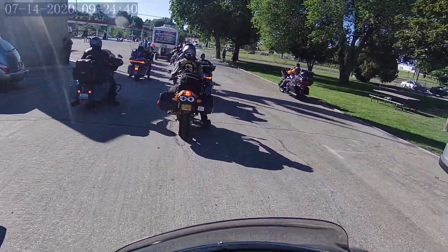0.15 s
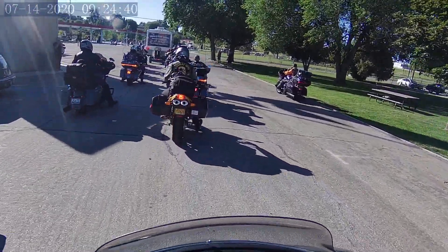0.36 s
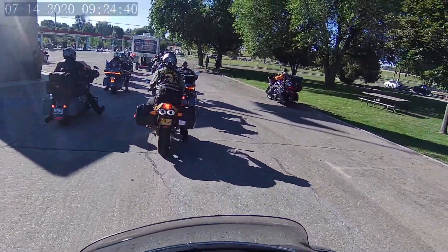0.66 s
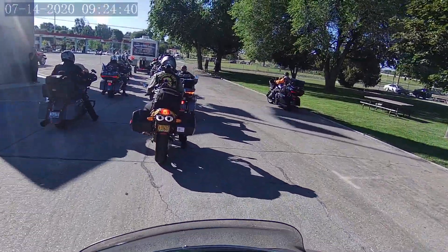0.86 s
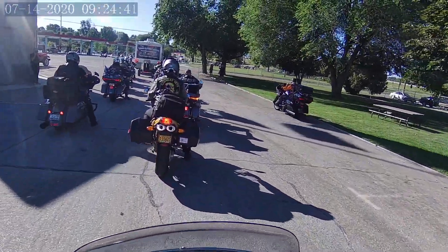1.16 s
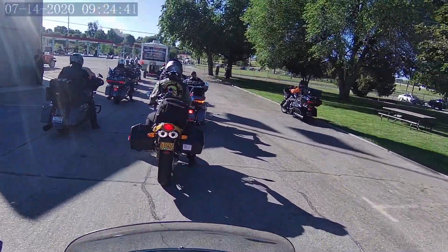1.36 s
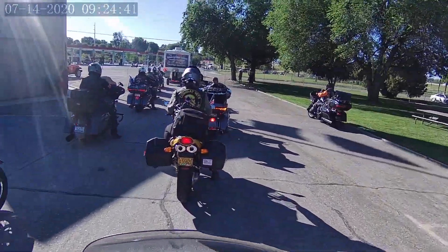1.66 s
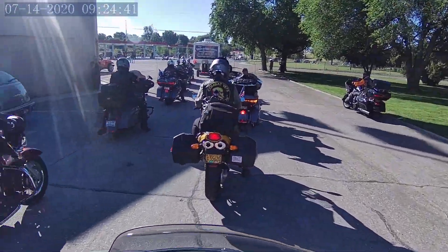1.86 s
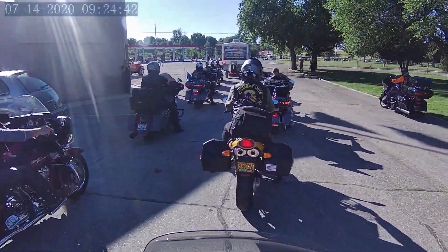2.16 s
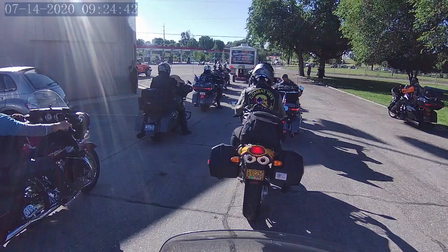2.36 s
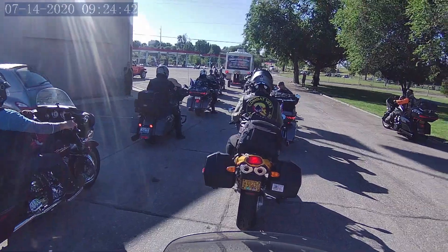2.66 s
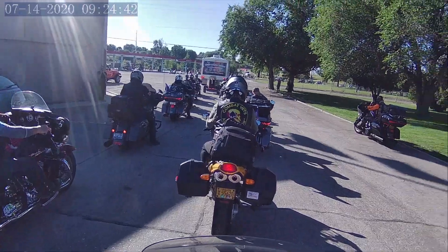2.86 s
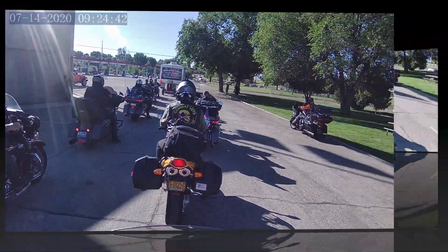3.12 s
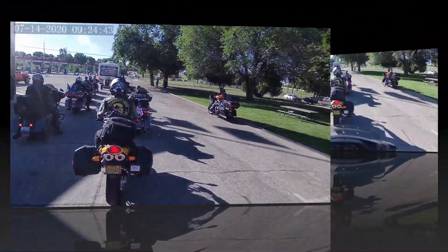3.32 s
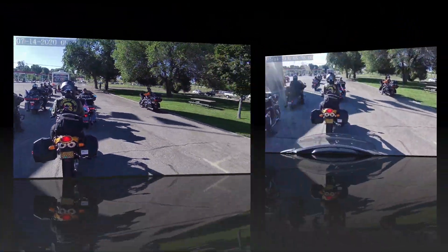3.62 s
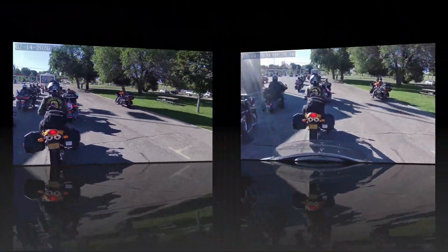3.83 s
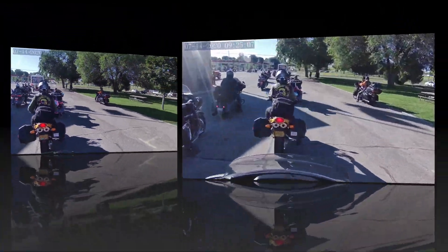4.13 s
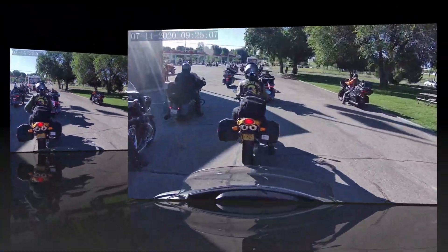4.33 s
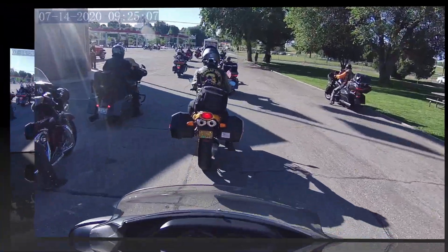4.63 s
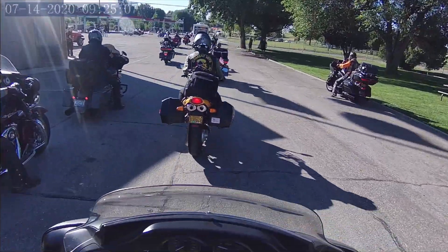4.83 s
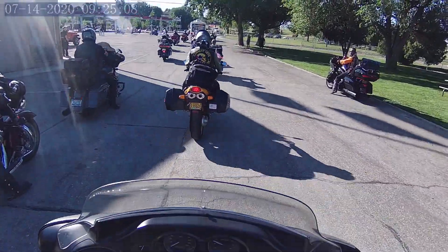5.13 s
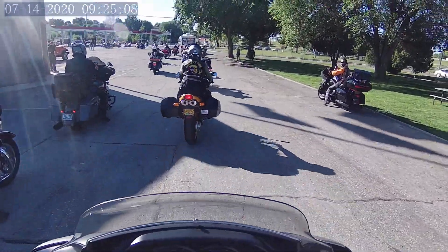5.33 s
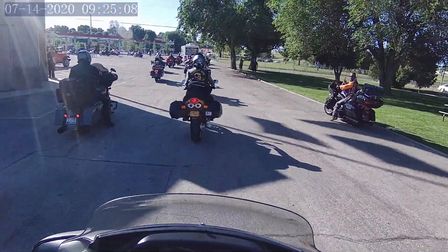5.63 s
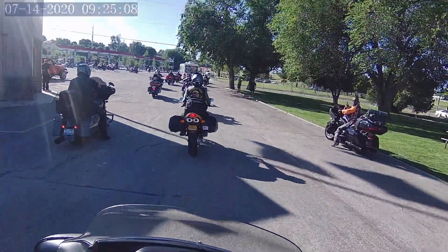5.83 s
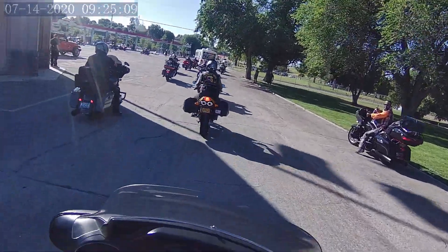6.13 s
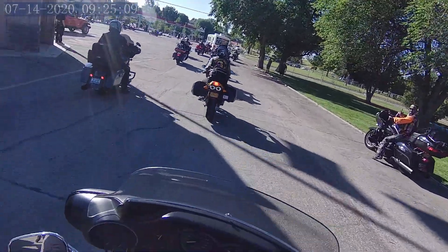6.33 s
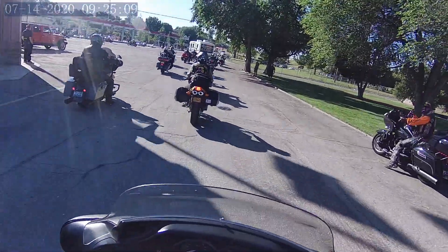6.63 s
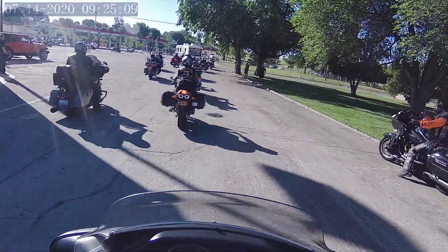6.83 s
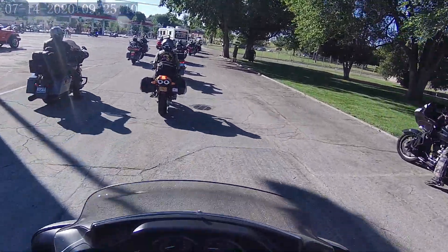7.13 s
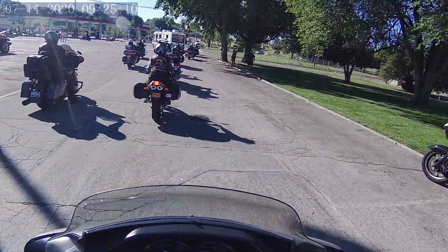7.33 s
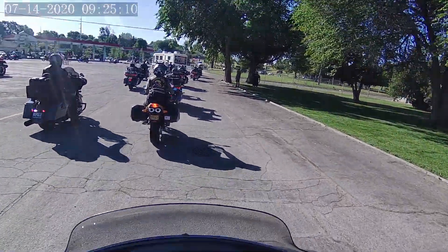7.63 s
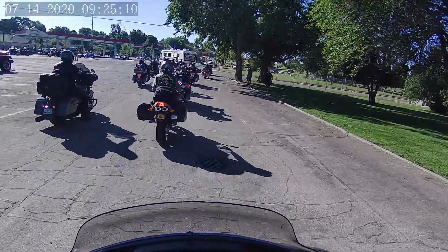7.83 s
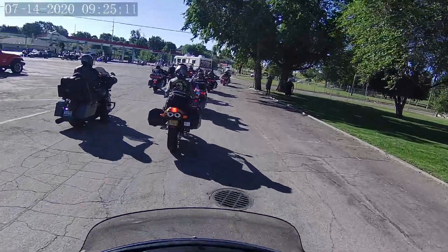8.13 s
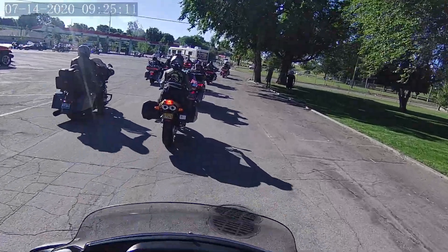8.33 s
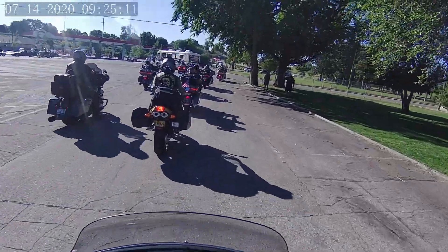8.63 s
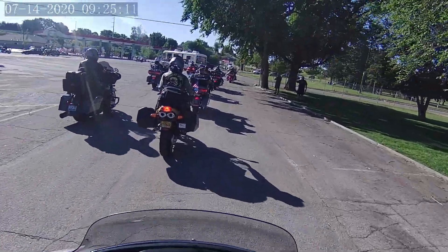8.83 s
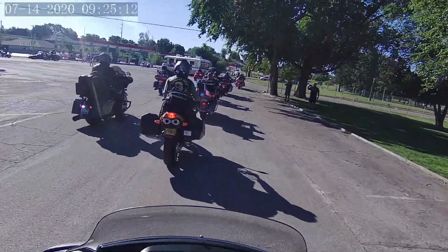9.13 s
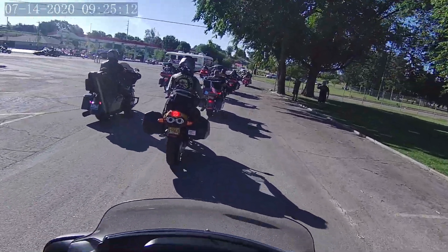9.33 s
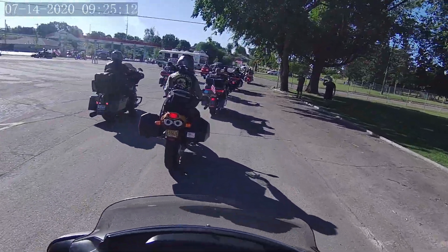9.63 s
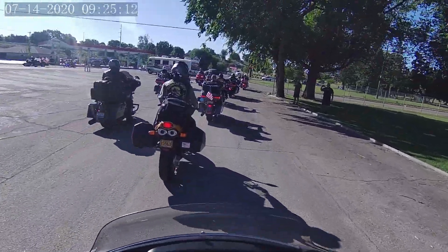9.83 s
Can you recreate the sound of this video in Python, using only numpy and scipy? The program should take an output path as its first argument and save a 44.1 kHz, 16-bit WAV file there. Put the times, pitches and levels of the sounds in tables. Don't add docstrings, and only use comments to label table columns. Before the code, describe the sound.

A motorcycle idles in an open parking lot, heard through a small, muffled microphone riding on it. From 0 to 3 seconds it is quiet: a low, fluttering engine hum, scattered tiny metallic valve ticks, a faint wavering gear whine around 1 to 2.5 seconds, and distant bikes. Around 3 to 4 seconds the sound swells into a louder moment, with heavy exhaust thumps and hissing, rattling roar. A hard throttle blip cracks sharply near 4.2. From about 4.6 to 6.3 a twin-cylinder bike rolls past close by, booming unevenly with dry pops, while more revs bark and the group rumbles. Strong cracks and thumps continue until about 6.8. Then the throttle shuts: chugs and harder ticks, with a brief muffled burble near 7.4 to 7.7. After 8 seconds it fades to soft regular thumps, valve ticks and low idle.

```python
import sys
import numpy as np
from scipy import signal
from scipy.io import wavfile
from scipy.ndimage import uniform_filter1d

SR = 44100
rng = np.random.default_rng(int(sys.argv[2]) if len(sys.argv) > 2 else 0)


def boost(x):
    u = np.asarray(x, float) / 20
    return 10 ** u


def dump(signal):
    limited = np.clip(np.atleast_2d(signal).T, -1, 1)
    pcm = np.round(limited * 32767).astype(np.int16)
    wavfile.write(sys.argv[1], SR, pcm)


N = 439677


def evened(x):
    return x / np.sqrt(np.mean(x ** 2) + 1e-20)


def colour(x, points, size=8192):
    hz, db = np.transpose(points)
    grid_hz = abs(np.fft.fftfreq(size, 1 / SR))
    gain_db = np.interp(np.log(grid_hz + 1), np.log(hz), db, -90, -90)
    log_gain = gain_db * np.log(10) / 20
    taps = np.fft.ifft(np.exp(np.conj(signal.hilbert(log_gain)))).real[:size // 2]
    return signal.oaconvolve(x, taps)[:len(x)]


def curves(rows):
    s, *columns = np.transpose(rows)
    return [np.interp(np.arange(N) / SR, s, c) for c in columns]


def seconds(length_s):
    return np.arange(round(length_s * SR)) / SR


def tone(hz, t):
    return np.sin(2 * np.pi * hz * t)


def spikes(s, size):
    train = np.zeros(N)
    at = np.round(np.asarray(s) * SR).astype(int)
    np.add.at(train, np.minimum(at, N - 1), size)
    return train


def ring_out(train, response):
    return signal.oaconvolve(train, response)[:N]


def patchy(points, spread_db):
    z = signal.stft(colour(rng.standard_normal(N), points), nperseg=128)[2]
    patches = uniform_filter1d(rng.standard_normal(z.shape), size=3, axis=0)
    patches = evened(uniform_filter1d(patches, size=8, axis=1))
    return evened(signal.istft(z * boost(spread_db * patches), nperseg=128)[1][:N])


def shock(train, points):
    return colour(train, points) / abs(colour(signal.unit_impulse(2048), points)).max()


def puff(low_hz, drop_hz, drop_s, t60):
    t = seconds(.12)
    hz = low_hz + drop_hz * np.exp(-t / drop_s)
    push = boost(-60 * t / t60) * np.sin(2 * np.pi * np.cumsum(hz) / SR)
    silencer = signal.butter(3, [55, 800], "bandpass", fs=SR, output="sos")
    return signal.sosfilt(silencer, push)


def lot(x, t60, wet_db):
    t = seconds(.3)
    tail = rng.standard_normal(len(t)) * boost(-60 * t / t60)
    return x + boost(wet_db) * ring_out(x, tail / np.linalg.norm(tail))


def cycles(crank, share=0):
    s, number = np.transpose(crank)
    turns = np.arange(number[0], number[-1] + 1 - np.ceil(share))
    return np.interp(turns + share, number, s)


def both_cylinders(crank, share):
    first, second = cycles(crank), cycles(crank, share)
    return np.r_[first, second], np.r_[0 * first, 0 * second + 1]


def firings(per_s, uneven_db, jitter_s):
    turns = np.cumsum(per_s) / SR + rng.random()
    at = np.flatnonzero(np.diff(np.floor(turns))) / SR
    chance = rng.standard_normal((len(at), 2))
    return spikes(abs(at + jitter_s * chance[:, 0]), boost(uneven_db * chance[:, 1]))


# t/s, nearness/dB, engine load/dB
GROUP = [(0.0, -38.5, -11.5), (1.64, -36.5, -7.5), (2.95, -36.5, -9), (3.55, -31.5, 8.5), (4.11, -21.5, 6),
         (4.41, -22, 11.5), (4.66, -12, 2), (4.94, -10, 1), (5.38, -12.5, 2), (5.7, -9, 0),
         (6.08, -14.5, 2), (6.19, -20, 12.5), (6.36, -18.5, -3.5), (6.64, -20.5, 8), (7.16, -20.5, -2),
         (7.61, -24.5, 3.5), (8.11, -30, 3.5), (9.5, -38, 3)]
# f/Hz, level/dB
GROUP_PIPE = [(18, -61), (30, -27), (53, -9), (75, -9), (96, -4), (129, -1), (209, -4), (274, -17),
              (500, -32), (650, -43), (1100, -120)]
# f/Hz, level/dB
ROAR = [(120, -32), (200, 4.5), (230, -1.5), (323, -14), (569, -17), (780, -27.5), (889, -22.5),
        (1420, -48), (1950, -40.5), (2700, -74.5), (3510, -95), (5940, -120)]
# f/Hz, level/dB
FAR_ROAR = [(180, -41.5), (300, 1.5), (335, -12), (367, -17.5), (530, -11.5), (686, -9.5), (795, -14),
            (982, -14.5), (2700, -43), (3510, -75), (5940, -120)]
# f/Hz, level/dB
HOUSING = [(1500, -5), (2300, -6), (2700, -29), (3000, -9), (3450, -20.5), (3800, -6), (4700, -4.5),
           (5150, -14), (5900, -11.5), (6900, -27.5), (8800, -18), (10800, -36.5), (13300, -35.5),
           (15200, -26)]
# t/s, level/dB
HISS_SWELL = [
    (3.0, -5),
    (3.5, -4.5),
    (4.1, -7.5),
    (4.55, -6.5),
    (4.75, -14),
]


def group(knocks):
    near_db, load_db = curves(GROUP)
    roar_db = -21 + 0.83 * near_db + load_db
    hiss_db = -63 + 0.33 * near_db + 0.72 * load_db + curves(HISS_SWELL)[0]
    rumble_db = near_db - np.clip(curves(PASSING_DB)[0] + 40, 0, 20) / 2.2
    rates_hz = (8.3, 9.9, 11.7, 16.5, 18.4, 23)
    pulses = sum(firings(np.full(N, per_s), 1.4, 0.005847) for per_s in rates_hz)
    rumble = evened(colour(lot(pulses, 0.06, 2.7), GROUP_PIPE))
    swell = evened(signal.lfilter([1], [1, -np.exp(-1 / (0.0082 * SR))], pulses))
    roar = evened(colour((1 + .7 * swell) * rng.standard_normal(N), ROAR))
    far = evened(colour(rng.standard_normal(N), FAR_ROAR))
    hiss = evened(colour((1 + 1.4 * swell) * rng.standard_normal(N), HOUSING[:-2]))
    low = boost(rumble_db - 2.0) * rumble + boost(roar_db + 0.5) * roar + boost(-53.5 - 5.5) * far
    return low + boost(hiss_db + 8.0) * hiss + boost(1.262 * hiss_db + 22.0) * knocks


# f/Hz, level/dB
RATTLE = [(3000, -7.5), (3900, -7), (4400, 8), (4800, -0.5), (5700, -4.5), (6300, -1), (8700, -11.5),
          (9500, -11)]


def rattle():
    knocks_per_s = 400
    size = boost(9.4 * np.minimum(rng.exponential(1, N), 2.6))
    size = size * (rng.random(N) < knocks_per_s / SR)
    part, t, out = rng.integers(0, len(RATTLE), N), seconds(.03), 0
    for k, (hz, db) in enumerate(RATTLE):
        ring = (1 - np.exp(-t / 0.001)) * boost(db - 60 * t / 0.0081) * tone(hz, t)
        out = out + ring_out(size * (part == k), ring)
    return evened(out)


def engine(speed, level, pipe, strong_order, strong_db, drift_s, smear, count):
    slow = 10
    t = np.arange(level[0][0], level[-1][0], slow / SR)
    per_s = np.interp(t, *np.transpose(speed))
    hz, pipe_db = np.transpose(pipe)
    turn = 2 * np.pi * np.cumsum(per_s) * slow / SR
    orders = 0
    for k in range(2, count):
        flutter = np.interp(t - t[0], np.arange(80) * drift_s, rng.standard_normal(80))
        order_db = np.interp(np.log(k * per_s), np.log(hz), pipe_db)
        order_db += strong_db + 0.69 * flutter if k == strong_order else 4.0 * flutter
        phase = 2 * np.pi * smear * rng.random()
        orders = orders + boost(order_db) * np.cos(k * turn + phase)
    sound = boost(np.interp(t, *np.transpose(level))) * evened(orders)
    return np.pad(signal.resample_poly(sound, slow, 1), (round(t[0] * SR), N))[:N]


# t/s, firing rate/Hz
IDLE_EARLY = [(0, 14), (.5, 13.87), (1, 14.08), (1.75, 13.9), (2.25, 13.01), (2.5, 12.8), (2.75, 12.27),
              (3.25, 11.59), (3.7, 11.2)]
IDLE_LATE = [(7.8, 11.05), (8.52, 11.02), (9, 11.57), (9.24, 11.52), (9.48, 10.99), (9.72, 10.51),
             (9.97, 10.6)]
# t/s, level/dB
EARLY_DB = [(0, -37.5), (1, -38), (2, -37.5), (2.8, -43), (3.4, -47), (3.7, -69)]
LATE_DB = [(7.801, -77), (8.2, -41.5), (9, -41.5), (9.5, -43.5), (9.97, -48.5)]
# f/Hz, level/dB
IDLE_PIPE = [(25, -30), (42, -31.5), (58, -12), (88, -17.5), (110, -2.5), (205, -1), (250, -9.5),
             (330, -21), (430, -26), (720, -30.5)]


def idles():
    early = engine(IDLE_EARLY, EARLY_DB, IDLE_PIPE, strong_order=15, strong_db=4.5,
                   drift_s=0.2124, smear=0.84, count=52)
    late = engine(IDLE_LATE, LATE_DB, IDLE_PIPE, strong_order=12, strong_db=12,
                  drift_s=0.15, smear=0.98, count=40)
    return early + late


# t/s, level/dB
WHINE_DB = [(.8, -85), (1.0, -62), (1.7, -62), (2.0, -72), (2.3, -64), (2.6, -85)]


def whine():
    teeth_per_cycle = 50.5
    waver = 1 + 0.0072 * evened(uniform_filter1d(rng.standard_normal(N), size=4000))
    turns = np.cumsum(curves(IDLE_EARLY)[0] * waver) / SR
    on = np.arange(N) < WHINE_DB[-1][0] * SR
    return boost(curves(WHINE_DB)[0]) * np.sin(2 * np.pi * teeth_per_cycle * turns) * on


# t/s, peak/dB, main ring f/Hz, high ring/dB, low ring/dB
EARLY_TICKS = [(0.0827, -62, 4600, -73, -76.5), (0.3241, -60, 4530, -88, -91.5),
               (0.5141, -57, 4600, -88, -92), (0.585, -60, 4900, -67, -75), (0.8015, -64, 4810, -63, -90),
               (1.2295, -64.5, 4320, -87, -87), (1.5403, -62, 4670, -67, -91),
               (1.586, -66, 4370, -63.5, -88), (1.6585, -58, 4600, -70, -70), (1.731, -48, 4530, -71, -85),
               (1.802, -61.5, 4140, -83, -71), (1.834, -60, 4170, -79.5, -84), (1.875, -62, 4400, -79, -64),
               (1.9479, -62, 4290, -94.5, -82), (1.9743, -62, 4040, -89, -67.5),
               (2.173, -55.5, 4220, -93, -77.5), (2.249, -53, 4370, -82, -79), (2.326, -70, 4100, -69, -78),
               (2.4817, -62, 4330, -60.5, -69), (2.561, -43.5, 4300, -71, -66),
               (2.7201, -60, 4340, -95.5, -70), (2.803, -55, 4540, -72.5, -70),
               (2.831, -58, 4260, -78, -74), (2.8842, -62, 4620, -63, -61), (3.0519, -59, 4460, -72, -75),
               (3.0896, -54.5, 3670, -85, -80), (3.224, -49.5, 4500, -64, -62),
               (3.3098, -49, 4260, -75, -75)]
# t/s, peak/dB, main ring f/Hz, high ring/dB
TICKS = [(3.3487, -48.5, 4030, -57), (3.3976, -46, 4170, -60), (6.772, -45, 3740, -67),
         (6.9665, -50.5, 3740, -81.5), (7.0995, -55.5, 3840, -71), (7.2167, -59, 3940, -66.5),
         (7.3324, -47.5, 4030, -55.5), (7.4383, -40, 4200, -58), (7.5313, -38, 4250, -63),
         (7.614, -40, 4110, -56.5), (7.6868, -54, 3980, -62), (7.768, -47, 4560, -74),
         (7.8548, -47.5, 4110, -65), (7.9467, -55, 3990, -64.5), (8.041, -56.5, 3860, -70.5),
         (8.1372, -51, 3910, -76), (8.2293, -54, 4050, -86), (8.3223, -50, 4050, -69),
         (8.4144, -56, 4100, -95), (8.5066, -54, 4040, -71), (8.687, -60.5, 4060, -69),
         (8.775, -50, 4180, -88), (8.862, -57, 4170, -77), (9.0353, -52.5, 4240, -80),
         (9.2962, -56, 4050, -72), (9.389, -63, 3890, -65), (9.4728, -61.5, 4165, -86),
         (9.5715, -64, 4150, -66), (9.664, -46, 4220, -73), (9.76, -64, 3950, -63), (9.855, -54, 4100, -69),
         (9.951, -46, 4180, -79)]
# t/s, peak/dB, f/Hz
PINGS = [(1.301, -57, 3035), (2.0222, -58, 3035), (2.125, -61, 3035), (2.4308, -60, 3035),
         (7.3806, -59, 2800), (7.4814, -57, 2930), (7.534, -47, 2140), (7.5692, -48, 2700),
         (7.6131, -41.5, 2250), (7.6465, -52, 2900), (7.8057, -57, 3150), (7.855, -55.5, 2200),
         (8.04, -65, 2350), (8.324, -59.5, 2290), (8.5076, -54, 2280)]
# t/s, peak/dB
CHIRPS = [(3.1762, -64), (3.4367, -57), (3.485, -61), (3.5748, -67), (3.664, -61), (3.703, -64),
          (3.756, -66), (1.301, -65), (9.1206, -76), (9.2069, -79)]


def tick_rows():
    early, pings = np.array(EARLY_TICKS), np.array(PINGS)
    s, db = np.transpose(CHIRPS)
    silent_db, low_hz = -110, 3035
    idle_low = np.c_[early[:, 0], early[:, 4] + 9.0, 0 * early[:, 0] + low_hz]
    low = np.r_[idle_low, pings]
    low = np.c_[low, 0 * low[:, 0] + silent_db]
    chirps = np.c_[s, 0 * s + silent_db, 0 * s + low_hz, db]
    return np.r_[early[:, :4], TICKS, low, chirps]


# main ring t60/s, high ring f/Hz, high ring t60/s
TICK_RINGS = (0.028, 9030, 0.018)


def ticks():
    out, t = np.zeros(N + SR), seconds(.05)
    t60, high_hz, high_t60 = TICK_RINGS
    rise = 1 - np.exp(-t / 0.002)
    rows = tick_rows()
    chances = rng.uniform(-1, 1, (len(rows), 2, 3, 1))
    for (s, db, hz, high_db), chance in zip(rows, chances):
        cluster = tone(hz, t) + 0.87 * tone(hz * (1 + 0.064 * chance[0]), t).sum(0)
        ring = boost(db - 2.0 - 60 * t / t60) * cluster
        ring += boost(2.91 * db + 68.5 - 60 * t / t60) * tone(1.36 * hz, t)
        bright = tone(high_hz * (1 + 0.075 * chance[1]), t).sum(0)
        ring += boost(high_db + 6.5 - 60 * t / high_t60) * bright
        out[round(s * SR):][:len(t)] += rise * ring
        rebound_s = s + .021 + .007 * chance[1, 0, 0]
        out[round(rebound_s * SR):][:len(t)] += boost(-14) * rise * ring
    return out[:N]


# t/s, cycle number
PASSING_CRANK = [(4.527, 0), (4.602, 2), (4.7518, 6), (4.9028, 10), (5.0136, 13), (5.1298, 16),
                 (5.4092, 23), (5.6055, 28), (5.8047, 33), (5.9264, 36), (6.0527, 39), (6.1846, 42),
                 (6.2756, 44)]
# t/s, level/dB
PASSING_DB = [
    (4.5, -50.5),
    (4.7, -22),
    (4.95, -20),
    (5.399, -20),
    (5.8, -21),
    (6.15, -18),
    (6.25, -23.5),
    (6.4, -57),
]


def passing():
    s, late = both_cylinders(PASSING_CRANK, share=.415)
    db = np.interp(s, *np.transpose(PASSING_DB))
    chance = rng.standard_normal((len(s), 2)).T
    snap_db = db - 6.1 * late + 3.4 * chance[0]
    boom_db = db + 9.5 - 3.7 * late + 2.46 * chance[1]
    snaps = ring_out(spikes(s, boost(snap_db)), puff(230, 150, .002, .02))
    booms = ring_out(spikes(s, boost(boom_db)), puff(105, 105, .006, .085))
    return snaps + booms


# t/s, peak/dB
POPS = [(4.6022, -29), (4.639, -27), (4.717, -33), (4.788, -27), (4.8304, -30), (4.8454, -43),
        (4.918, -41.5), (4.94, -32.5), (4.994, -35.5), (5.093, -54.5), (5.249, -33.5)]
# f/Hz, level/dB
POP = [(200, -8), (500, 8.5), (1000, 0), (1400, -20), (2300, -21), (3300, -43.5)]


def pops():
    s, db = np.transpose(POPS)
    return lot(shock(spikes(s, boost(db + 5)), POP), t60=0.039, wet_db=-2.0)


# opens t/s, peaks t/s, shuts t/s, treble peak/dB, mid peak/dB
BLIPS = [(3.459, 3.557, 3.56, -36, -22), (3.62, 3.724, 3.76, -37, -40), (3.82, 3.84, 3.87, -37, -40),
         (4.164, 4.223, 4.31, -12, -17), (4.296, 4.524, 4.56, -38, -35), (4.57, 4.65, 4.76, -58, -35.5),
         (5.145, 5.3, 5.4, -30, -27.5), (5.478, 5.56, 5.7, -24, -29), (5.68, 5.747, 5.86, -29, -29),
         (5.981, 6.138, 6.26, -22, -23), (6.194, 6.285, 6.38, -29, -24), (6.568, 6.603, 6.73, -23.5, -26),
         (6.75, 6.784, 6.8, -42, -28.5), (6.95, 6.96, 7.0, -51.5, -46), (7.337, 7.438, 7.5, -44.5, -29.5),
         (7.495, 7.627, 7.71, -38.5, -25), (7.819, 7.846, 7.93, -49, -43.5)]


def throttle(s):
    opens, peaks, shuts, treble_db, mid_db = np.transpose(BLIPS)[:, :, None]
    rising = (peaks - s) / (peaks - opens)
    falling = (s - peaks) / (shuts - peaks)
    off = np.where(s < peaks, rising, falling)
    fall_db = np.where(off <= 1, -16 * off ** 1.4, -99)
    return (treble_db + fall_db).max(0), (mid_db + fall_db).max(0)


# t/s, peak/dB, f/Hz
THUMPS = [(2.965, -21.5, 135), (3.406, -20, 128.5), (3.511, -19, 152), (3.679, -20, 150), (3.771, -16, 152),
          (3.859, -14.5, 129), (3.957, -14, 141), (4.035, -12.5, 132), (4.123, -10, 144),
          (4.197, -13.5, 144), (4.374, -12, 137), (4.445, -13, 132), (4.535, -17, 148),
          (4.762, -8.5, 115.7), (4.823, -25.5, 130.6), (4.906, -12, 128), (6.196, -14.5, 162),
          (6.232, -17.5, 137.7), (6.266, -7, 170.5), (6.301, -9, 151), (6.348, -15.5, 137.7),
          (6.384, -11, 142.5), (6.441, -7.5, 145.4), (6.508, -7.5, 137.2), (6.634, -12.5, 196),
          (6.692, -9.5, 135.5), (6.772, -21.5, 129), (6.912, -7, 131.5), (7.012, -10.5, 161.7),
          (7.123, -12.5, 107.4)]
# t/s, peak/dB, f/Hz
COAST_THUMPS = [(7.232, -8.5, 143), (7.344, -11, 137), (7.435, -8, 131), (7.555, -9.5, 150),
                (7.606, -19, 170), (7.659, -14, 155.4), (7.681, -10.5, 149.5), (7.711, -12, 166),
                (7.862, -13, 144), (7.959, -11, 134), (7.991, -22, 120), (8.013, -16.5, 133),
                (8.055, -16, 140), (8.25, -15.5, 124), (8.338, -21.5, 155), (8.437, -24.5, 117),
                (8.463, -28, 140), (8.498, -22.5, 147), (8.544, -18, 139)]
# t/s, peak/dB
COAST_DB = [(8.6, -26), (8.9, -28.5), (9.97, -29)]


def thump_rows():
    s = cycles(CRANK_COASTING)
    s = s[s > COAST_DB[0][0]]
    chance = rng.standard_normal((len(s), 2)).T
    own_db = np.interp(s, *np.transpose(COAST_DB)) + 1 * chance[0]
    own_hz = 129.5 * (1 + 0.092 * chance[1])
    s, db, hz = np.c_[np.transpose(THUMPS + COAST_THUMPS), [s, own_db, own_hz]]
    rasp_db = db + np.where(s < COAST_THUMPS[0][0], -25.5, -23.5)
    return np.c_[s, db, hz, np.maximum(rasp_db, throttle(s)[1] - 1.5)]


# t/s, level/dB
CHUGS = [
    (7.148, -24),
    (7.808, -27),
    (7.857, -23.5),
    (7.893, -30),
    (8.326, -29.5),
    (8.359, -31),
    (8.504, -35),
]
# f/Hz, level/dB
RASP = [(250, -17), (400, 5.5), (650, 10.5), (950, -18.5), (1300, -40.5)]


def thumps():
    out, t = np.zeros(N + SR), seconds(.1)
    shape = (t / 0.0085) ** 1.87 * np.exp(1.5 - 2.047 * t / 0.011)
    rows = thump_rows()
    for s, db, hz, _ in rows:
        pipe = tone(hz, t) + 0.23 * tone(.45 * hz, t)
        out[round(s * SR):][:len(t)] += boost(db - 2.0) * shape * pipe
    s, _, _, rasp_db = rows.T
    s, rasp_db = np.c_[[s, rasp_db], np.transpose(CHUGS)]
    decay = (1 - np.exp(-t / 0.0026)) * boost(-60 * t / 0.2)
    rasp = ring_out(spikes(s, boost(rasp_db - 10.0)), decay)
    return out[:N] + rasp * patchy(RASP, 2.9)


# t/s, cycle number
CRANK_REVVING = [(3.441, 0), (3.5103, 1), (3.696, 4), (3.84, 6), (4.1652, 10), (4.2347, 11), (4.401, 14),
                 (4.575, 17), (4.6396, 18), (4.7894, 20), (5.229, 25),
                 (5.3012, 26), (5.3665, 27), (5.568, 30), (5.8052, 34), (6.018, 37), (6.1021, 38),
                 (6.238, 40), (6.3, 41), (6.3558, 42), (6.641, 46), (6.702, 47), (6.7753, 48)]
CRANK_COASTING = [(6.86, 49), (6.9694, 50), (7.105, 51), (7.333, 53), (7.439, 54), (7.5308, 55),
                  (7.6131, 56), (7.687, 57), (7.7683, 58), (7.8546, 59), (8.1374, 62), (8.5071, 66),
                  (8.8618, 70), (9.2085, 74), (9.5722, 78), (9.9508, 82)]
# t/s, treble peak/dB, mid level/dB, pipe ring f/Hz
CRACKS = [(3.4688, -51, -51, 1400), (3.512, -38, -48, 1390), (3.5365, -35, -41, 1430),
          (3.6948, -47, -53.5, 1400), (3.8398, -41, -46.5, 1750), (4.1654, -45, -38, 1270),
          (4.1984, -25.5, -32.5, 1310), (4.2318, -24, -31.5, 1310), (4.2568, -26, -32, 1300),
          (4.2851, -42, -38, 1330), (4.371, -41, -53, 1980), (4.4, -43.5, -57.5, 1430),
          (4.4268, -38.5, -55.5, 1980), (4.458, -43, -55.5, 1430), (4.5122, -38, -47.5, 2000),
          (4.6488, -44, -49, 1290), (4.6806, -45, -49.5, 1920), (5.1791, -41, -50, 1990),
          (5.2265, -37.5, -34.5, 1380), (5.262, -34.5, -37.5, 1250), (5.301, -29, -31.5, 1380),
          (5.328, -32.5, -38.5, 1360), (5.3648, -43, -41, 1270), (5.497, -42.5, -53.5, 1410),
          (5.5275, -37, -37.5, 1490), (5.5664, -29.5, -35.5, 1320), (5.595, -41, -37.5, 1690),
          (5.6247, -33.5, -40, 1270), (5.6531, -44, -46, 1310), (5.684, -56, -48.5, 1270),
          (5.7124, -43, -41, 1900), (5.746, -32, -44, 1300), (5.7728, -47, -41, 1670),
          (5.8028, -42, -40.5, 1540), (6.02, -40.5, -39, 1540), (6.0569, -34.5, -35, 2010),
          (6.0986, -33, -28.5, 1380), (6.1318, -31, -33, 1630), (6.1733, -30, -34.5, 1370),
          (6.2018, -34.5, -38, 1350), (6.2379, -35.5, -34.5, 1410), (6.2642, -32.5, -37, 2030),
          (6.2977, -32.5, -27, 1330), (6.326, -36.5, -43.5, 1300), (6.356, -48, -36.5, 1270),
          (6.569, -50, -45, 1480), (6.601, -32, -28.5, 1730), (6.6379, -28, -30.5, 1330),
          (6.6658, -30, -30.5, 1470)]
LAST_CRACKS = [
    (6.7006, -34, -35, 1580),
    (6.7733, -46, -38.5, 1970),
    (7.3815, -61, -55, 1820),
    (7.482, -55, -54, 1530),
    (7.5706, -52, -53, 1810),
    (7.609, -47, -36, 1544),
    (7.648, -40, -38, 1970),
    (7.6866, -50.5, -41.5, 1530),
]


def crack_rows():
    s, late = both_cylinders(CRANK_REVVING + CRANK_COASTING, share=.44)
    treble_db, mid_db = throttle(s)
    uneven_db = -4 * rng.standard_normal((len(s), 2)).T
    rows = np.c_[s, treble_db - 3 * late + uneven_db[0], mid_db - 2.5 * late + uneven_db[1]]
    listed = np.array(CRACKS + LAST_CRACKS)[:, :3] + [0, 3.0, 9.0]
    free = abs(s[:, None] - listed[:, 0]).min(1) > .015
    return np.r_[rows[free], listed].T


def crack_puffs():
    s, _, mid_db, _ = np.transpose(CRACKS + LAST_CRACKS)
    return ring_out(spikes(s, boost(mid_db + 11.5)), puff(240, 300, 0.0024, .045))


# f/Hz, level/dB
CRACK_MID = [(180, -30), (300, 4.5), (374, -9), (429, -5.5), (766, -17), (955, -12.5), (1220, -22.5),
             (1870, -27.5), (2700, -43), (3510, -74), (5940, -120)]
# t/s, unused/dB, level/dB, f/Hz
LOUD_RING = (7.4388, -45, -35, 1470)


def cracks(knocks):
    s, treble_db, mid_db = crack_rows()
    t = seconds(.18)
    treble, mid = spikes(s, boost(treble_db - 8.0)), spikes(s, boost(mid_db))
    rise, gas = 1 - np.exp(-t / 0.00061), patchy(HOUSING, 3.1)
    top = signal.sosfiltfilt(signal.butter(4, 10500, "highpass", fs=SR, output="sos"), gas)
    quick = rise * boost(-60 * t / 0.027)
    burst = ring_out(treble, quick) * (gas - top)
    burst += ring_out(spikes(s, boost(1.6 * treble_db + 9.5)), quick ** 0.78) * top
    tail = ring_out(treble, rise * boost(-12.0 - 60 * t / 0.15))
    tail = tail * (patchy(HOUSING[3:-2], 7.4) + 0.35 * knocks)
    two_decays = boost(-60 * t / 0.032) + boost(-5.5 - 60 * t / 0.2)
    blast = ring_out(mid, rise * two_decays) * patchy(CRACK_MID, 2.7)
    rings = np.zeros(N + SR)
    for at, _, db, hz in CRACKS + LAST_CRACKS + [LOUD_RING]:
        ring = (1 - np.exp(-t / 0.0017)) * boost(db + 1.5 - 60 * t / 0.035) * tone(hz, t)
        rings[round(at * SR):][:len(t)] += ring
    steps = boost(-6.0) * shock(mid, CRACK_MID[2:]) + boost(-7) * shock(treble, HOUSING[:-2])
    return burst + tail + blast + rings[:N] + steps


def scene():
    knocks = rattle()
    background = group(knocks) + idles() + whine() + ticks()
    twin = passing() + pops()
    pipes = thumps() + crack_puffs() + cracks(knocks)
    return (background + twin + pipes)[None]


def roll_off(x):
    return signal.sosfilt(signal.butter(12, 16200, fs=SR, output="sos"), x)


def record(dry):
    cut = signal.sosfilt(signal.butter(3, 42, "highpass", fs=SR, output="sos"), dry)
    rounded = .52 * np.tanh(cut / .52)
    mix = rounded + boost(-99.0) * rng.standard_normal(dry.shape)
    return roll_off(mix)


dry = scene()
out = record(dry)
dump(out)
```